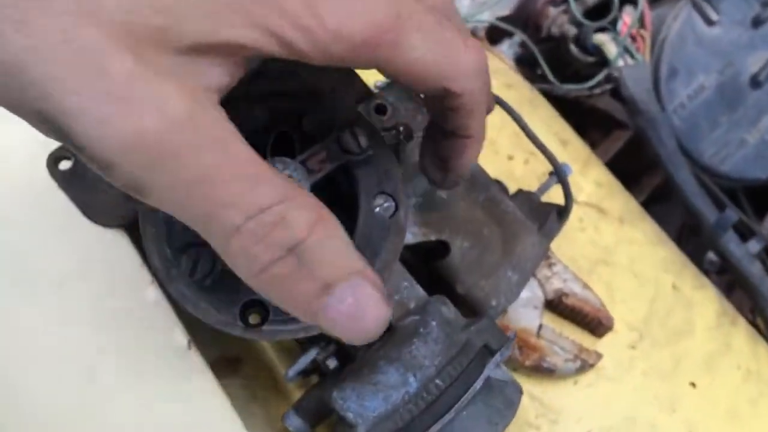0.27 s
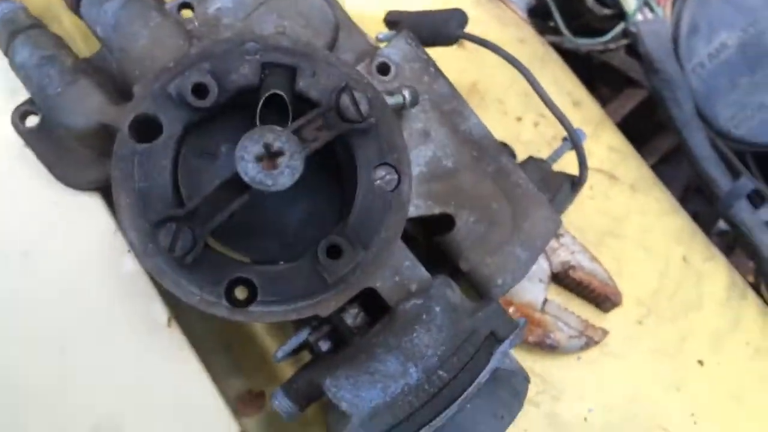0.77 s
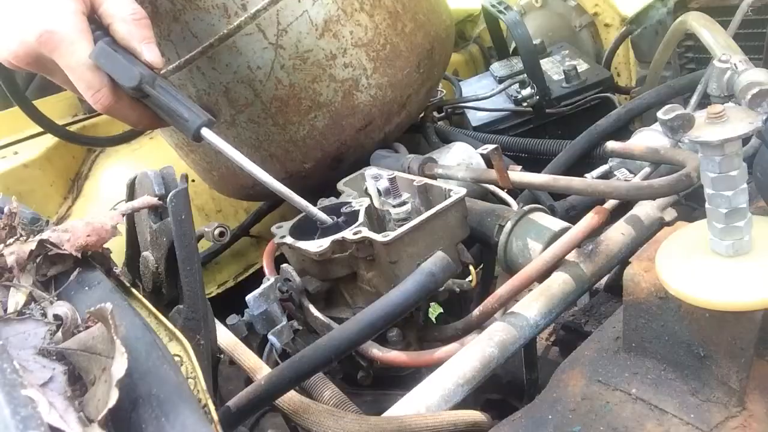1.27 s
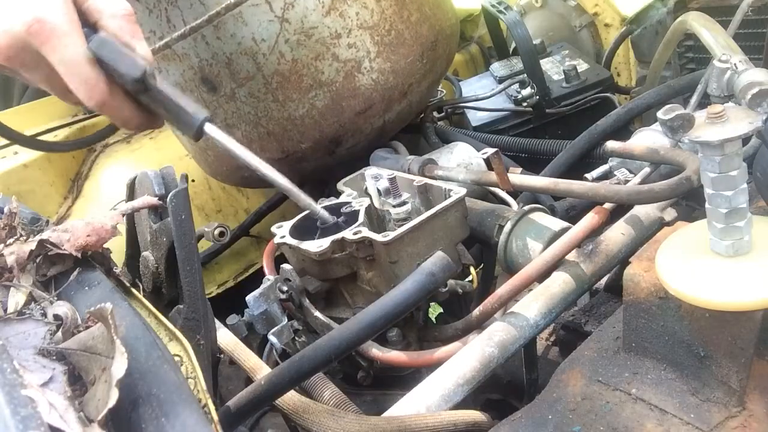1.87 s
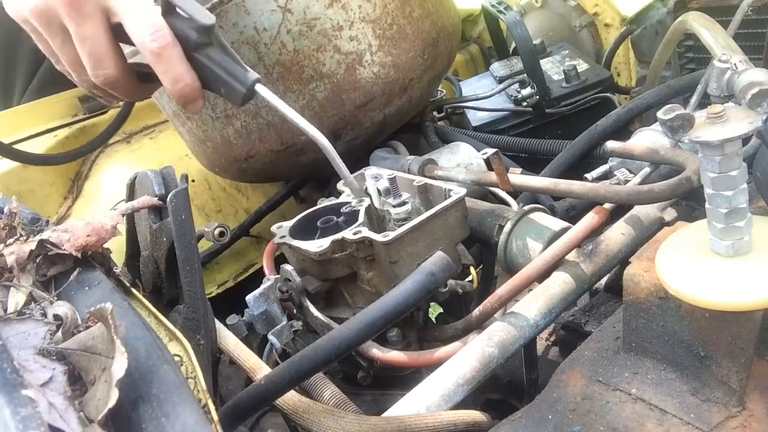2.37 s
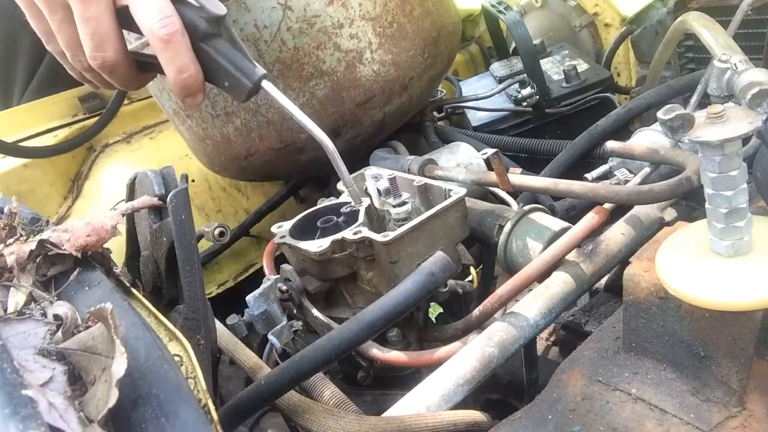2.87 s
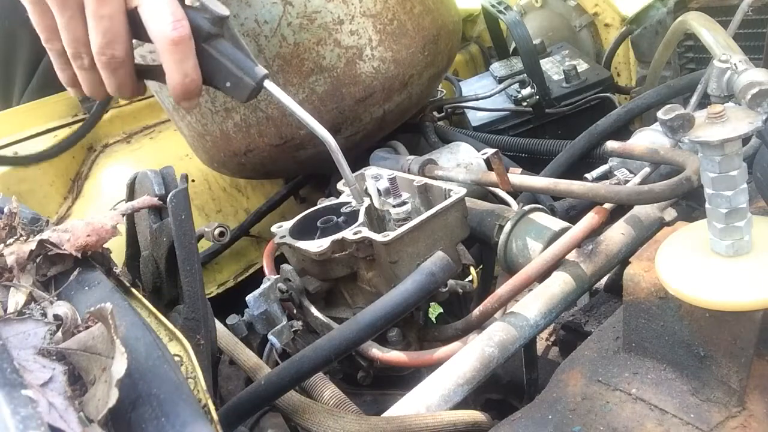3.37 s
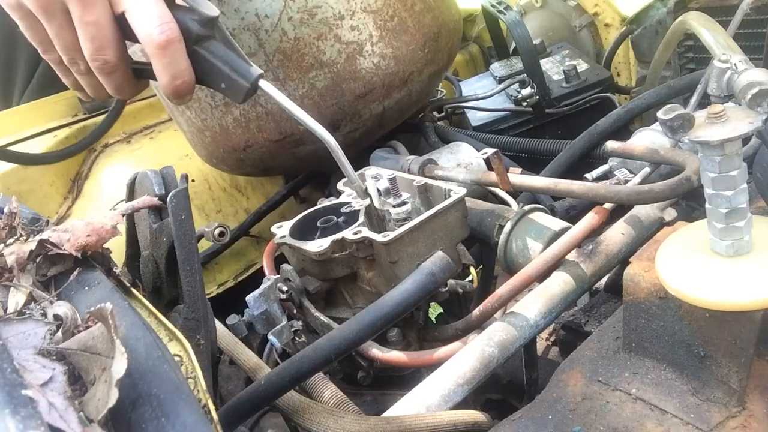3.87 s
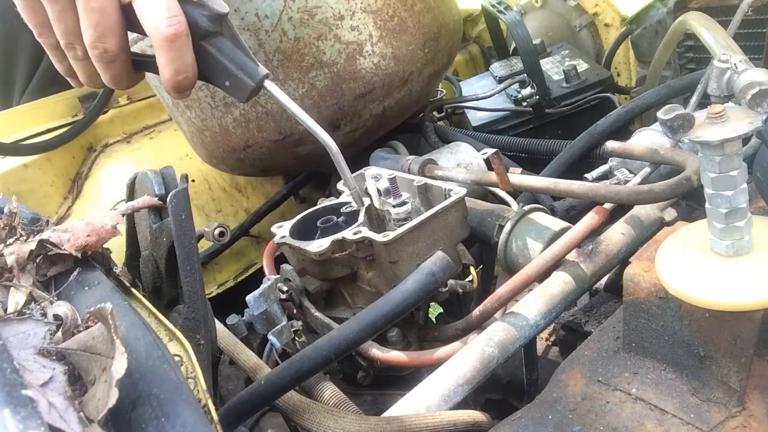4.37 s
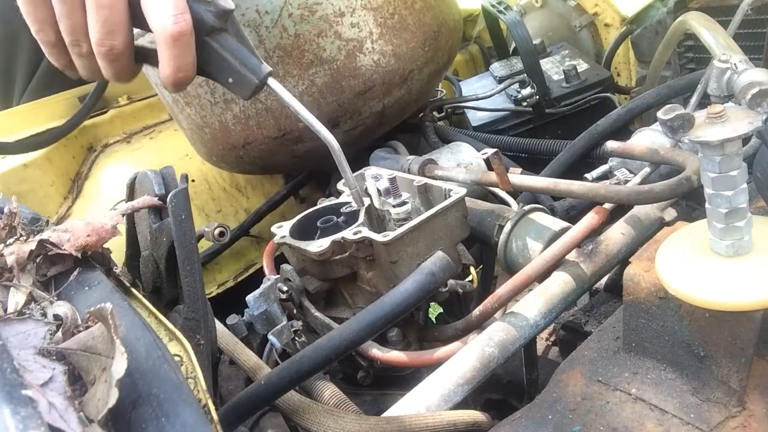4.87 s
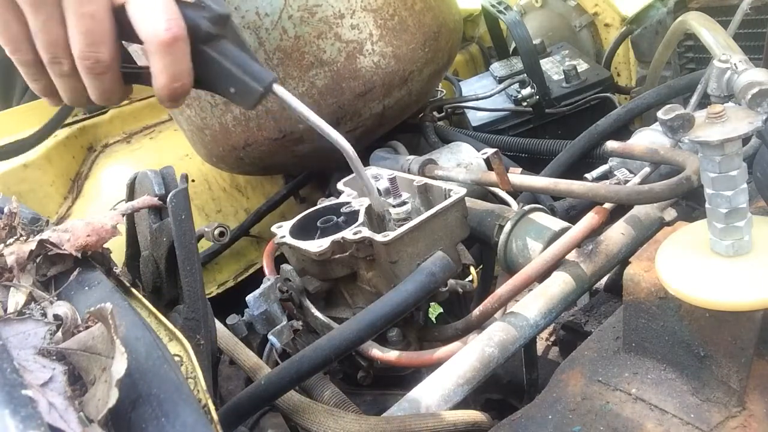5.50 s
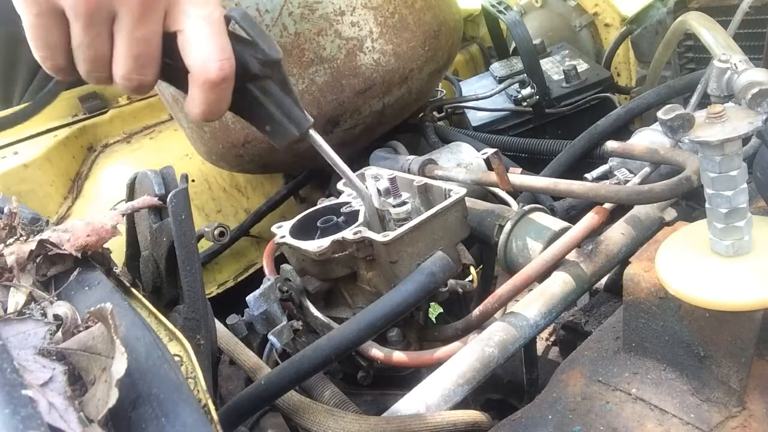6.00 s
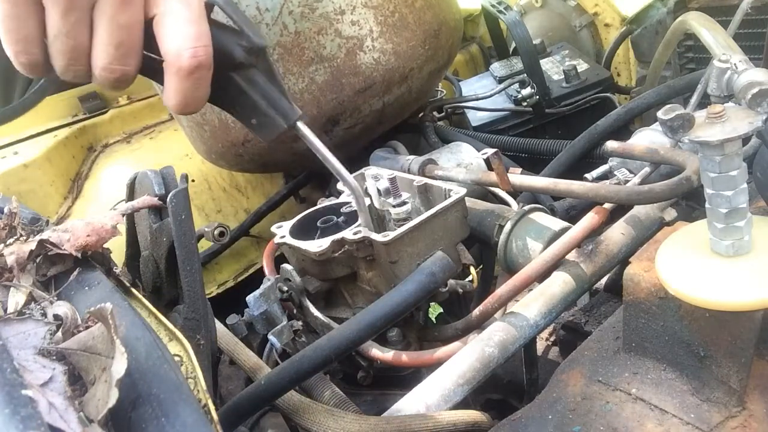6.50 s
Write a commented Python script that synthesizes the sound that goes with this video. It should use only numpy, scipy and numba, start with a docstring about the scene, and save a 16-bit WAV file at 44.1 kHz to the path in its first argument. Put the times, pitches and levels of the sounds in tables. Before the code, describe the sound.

A compressed-air gun fires ten short, harsh hissing blasts into a metal carburetor, with small metallic taps and clicks between them over a faint leaking hiss.

```python
"""First a still garage, with soft bumps of handling close to the microphone; then a rumble and a leaking hiss start.
A compressed-air blow gun fires ten short blasts into an open carburettor: shaped noise hisses, roars and takes
the colour of the hollow it is aimed at. Damped swings make the gusts, bumps and knocks, and noise bursts ring the
metal for taps and clicks. The recorder's limiter flattens the blasts and ducks the background after them."""
import sys
import numpy as np
from scipy import signal
from scipy.fft import rfft, irfft
from scipy.io import wavfile
from scipy.ndimage import uniform_filter1d, minimum_filter1d
from numba import njit

SR = 44100
rng = np.random.default_rng(int(sys.argv[2]) if len(sys.argv) > 2 else 0)


def generate_wav(sig):
    """Save sig (samples, or channels by samples) to the path in sys.argv[1] as 16-bit PCM at SR."""
    pcm = np.round(np.clip(np.atleast_2d(sig).T, -1, 1) * 32767).astype(np.int16)
    wavfile.write(sys.argv[1], SR, pcm)


N = 297234
TIME = np.arange(N) / SR
FREQ = np.maximum(np.arange(N // 2 + 1) * SR / N, 1)
WORK_STARTS_S = 1.149


def undb(db):
    """Decibels to gain."""
    return 10 ** (np.asarray(db) / 20)


def unit(x):
    """Scale to rms 1."""
    return x / np.sqrt(np.mean(x ** 2))


def curve(rows):
    """Join (time [s], value) rows by straight lines."""
    return np.interp(TIME, *np.transpose(rows))


def contour(points):
    """Level [dB] at every frequency, joined from (frequency [Hz], level [dB]) points."""
    hz, db = np.transpose(points)
    return np.interp(np.log(FREQ), np.log(hz), db)


def noise(shape_db):
    """Noise of rms 1 with the given spectrum."""
    return unit(irfft(rfft(rng.standard_normal(N)) * undb(shape_db), N))


def walk(rate):
    """Random wandering of spread about 1, heading for `rate` new values a second."""
    values = rng.standard_normal(N // 8)
    return 1.22 * np.interp(TIME * rate, np.arange(N // 8), values)


def band(x, hz, kind):
    """Gentle causal filter."""
    return signal.sosfilt(signal.butter(2, hz, kind, fs=SR, output="sos"), x)


def resonate(x, modes):
    """Ring a set of (frequency [Hz], width [Hz], level [dB]) resonances."""
    out = 0
    for hz, width, db in modes:
        out = out + undb(db) * signal.lfilter(*signal.iirpeak(hz, hz / width, SR), x)
    return out


def envelope(start, stop, rise, fall, drop_db=22):
    """Rise quickly, hold until `stop`, then lose drop_db in every `fall` seconds."""
    opening = np.clip((TIME - start) / rise, 0, 1) ** 2
    return opening * undb(-drop_db * np.clip((TIME - stop) / fall, 0, 10))


def place(sound, start):
    """Set a short sound at its time."""
    return np.pad(sound, (int(start * SR), N))[:N]


def push(start, db, hz, swell):
    """A soft push: a well damped swing whose envelope peaks after `swell` seconds and dies."""
    t = TIME[:SR // 4]
    shape = t / swell * np.exp(1 - t / swell)
    return place(undb(db) * shape * np.sin(2 * np.pi * hz * t), start)


def reflect(x, echo_db, count=8, longest_s=0.005, drift_s=0.00003):
    """Small engine parts nearby mirror the treble and comb the hiss; the paths shift as the hand moves."""
    out, treble = x, band(x, 1500, "high")
    for _ in range(count):
        delay = rng.uniform(0.000752, longest_s) + drift_s * walk(1.8)
        out = out + undb(echo_db) * np.interp(TIME - delay, TIME, treble)
    return out


# spectrum of the hiss at the shut valve: (frequency [Hz], relative density [dB per Hz])
LEAK_SPECTRUM = [(1060, -38), (1800, -9.5), (3620, -11.5), (3960, -15), (5000, -10), (6480, -8.5),
                 (7750, -6), (11500, -7.5), (12600, -6), (14600, -11), (15300, -3.5)]
# centre of the airy whistle in the leak: (time [s], frequency [Hz])
WHISTLE_PITCH = [(2.0, 7550), (2.166, 7940), (2.93, 7550), (3.05, 7590)]
LEAK_DB, LEAK_SAG_DB_PER_S = -47.5, 0.36
WHISTLE_DB = -64  # away from its swell
SWELL_S, SWELL_DB, SWELL_RISE_S, SWELL_FADE_S = 2.27, 11, 0.35, 0.75


def leak(waver_db=0.2, whistle_half_width_hz=600):
    """Air seeps past the shut valve: a thin, sinking hiss with an airy whistle that flares up once and fades."""
    phase = 2 * np.pi * np.cumsum(curve(WHISTLE_PITCH)) / SR
    swell = np.exp(np.minimum((TIME - SWELL_S) / SWELL_RISE_S, (SWELL_S - TIME) / SWELL_FADE_S))
    # slow noise times a tone is a band of noise around its pitch
    breath = band(rng.standard_normal(N), whistle_half_width_hz, "low")
    whistle = unit(breath * np.sin(phase)) * undb(WHISTLE_DB + SWELL_DB * swell)
    hiss_db = LEAK_DB - LEAK_SAG_DB_PER_S * (TIME - WORK_STARTS_S) + waver_db * walk(6.2)
    hiss = noise(contour(LEAK_SPECTRUM)) * undb(hiss_db)
    return reflect(hiss + whistle, echo_db=-14)


# spectrum of the still garage: (frequency [Hz], relative density [dB per Hz])
QUIET_SPECTRUM = [(15, -46.5), (25, -13), (59, -1.5), (186, -15.5), (264, -14), (354, -18), (558, -21),
                  (952, -16), (1030, -17.5), (2130, -28), (3630, -34.5), (4750, -35), (5880, -38),
                  (15000, -47)]
# spectrum of the rumble during the work: (frequency [Hz], relative density [dB per Hz])
RUMBLE_SPECTRUM = [(15, -37), (25, -16.5), (70, 2.5), (125, -1), (208, -5.5), (338, -17.5), (439, -10.5),
                   (651, -17), (1020, -11), (1430, -14.5), (1630, -25.5), (2200, -38), (2860, -53.5),
                   (4840, -120)]
QUIET_DB, RUMBLE_DB = -57.5, -46.5
RUMBLE_SAG_FROM_S, RUMBLE_SAG_DB_PER_S = 1.84, 2.53


def background(throb_db=1.0):
    """A still garage at first; then, abruptly, the leaking gun and a louder rumble that holds, then sinks."""
    sag_db = RUMBLE_SAG_DB_PER_S * np.maximum(TIME - RUMBLE_SAG_FROM_S, 0)
    rumble = noise(contour(RUMBLE_SPECTRUM)) * undb(RUMBLE_DB - sag_db + throb_db * walk(25))
    quiet = noise(contour(QUIET_SPECTRUM)) * undb(QUIET_DB)
    return np.where(TIME < WORK_STARTS_S, quiet, leak() + rumble)


# colour of the reverberation from the walls: (frequency [Hz], relative level [dB])
WALL_COLOUR = [(60, -15.5), (400, -9.5), (1100, -8.5), (2500, -1.5), (6000, 2.5), (15000, 1)]
# sheet metal of the engine bay that sings on: (frequency [Hz], width [Hz], level [dB])
PANELS = [(1197, 80, -34), (2770, 200, -34), (3834, 130, -37.5)]


def garage(x, wet_db=-25.5, t60=0.19, panel_t60=1.0):
    """A short, faint reverberation from the walls, and a longer ring of the sheet metal."""
    t = TIME[:SR]
    walls = noise(contour(WALL_COLOUR))[:SR] * undb(-60 * t / t60)
    panels = rng.standard_normal(SR) * undb(-60 * t / panel_t60)
    tail = undb(wet_db) * walls / np.linalg.norm(walls)
    tail = tail + resonate(panels / np.linalg.norm(panels), PANELS)
    return x + signal.fftconvolve(x, tail)[:N]


# soft bumps from handling: (time [s], envelope peak [dB], frequency [Hz])
BUMPS = [(0.265, -37.5, 122), (.865, -42, 81), (.948, -38, 101), (0.996, -46, 90), (1.03, -43, 105),
         (1.115, -32, 96), (1.239, -29.5, 109)]
# hollow knocks that ring a little longer: (time [s], envelope peak [dB], frequency [Hz])
KNOCKS = [(1.242, -36.5, 237), (3.955, -44, 441)]
# fingers rub the parts and the gun: (start [s], end [s], level [dB], low edge [Hz], high edge [Hz])
RUBS = [(0.763, 0.82, -72, 4100, 4930), (1.132, 1.324, -45, 80, 258), (5.13, 5.202, -54.5, 2470, 3280)]
BUMP_SWELL_S, KNOCK_SWELL_S = 0.0067, 0.019
RUB_RISE_S, RUB_FALL_S = 0.016, 0.048


def handling():
    """The hand bumps and knocks (damped swings) and rubs (bands of noise) the carburettor and the gun."""
    bumps = sum(push(start, db, hz, BUMP_SWELL_S) for start, db, hz in BUMPS)
    knocks = sum(push(start, db, hz, KNOCK_SWELL_S) for start, db, hz in KNOCKS)
    rubs = 0
    for start, stop, db, low_hz, high_hz in RUBS:
        friction = unit(band(rng.standard_normal(N), (low_hz, high_hz), "band"))
        rubs = rubs + undb(db) * friction * envelope(start, stop, RUB_RISE_S, RUB_FALL_S)
    return bumps + knocks + rubs


# modes of the nozzle and casting: (frequency [Hz], width [Hz], level [dB])
METAL = [(1180, 250, -3.5), (1700, 300, 0.5), (2500, 490, 5), (3930, 600, -9.5), (6700, 2000, -13.5)]


def contact(start, db, bright_db, t60, tick_db=-19, crack_db=6, crack_s=0.00075):
    """A sharp crack and a brief scuff that ring the nozzle and the casting."""
    t = TIME[:SR // 4]
    fading = undb(-60 * t / t60) + undb(crack_db) * np.exp(-t / crack_s)
    scuff = rng.standard_normal(len(t)) * fading
    ring = resonate(scuff, METAL) + undb(tick_db) * band(scuff, 900, "high")
    # tilt around 2 kHz, level below 1 kHz
    hz = np.arange(len(t) // 2 + 1) * SR / len(t)
    octaves = np.log2(np.maximum(hz, 1000) / 2000)
    ring = irfft(rfft(ring) * undb(bright_db * octaves), len(t))
    return place(undb(db) * ring / np.abs(ring).max(), start)


# the nozzle taps the casting: (time [s], peak [dB], brightness [dB per octave])
TAPS = [(1.646, -30, 3.5), (2.105, -33, -12), (2.406, -29, -6), (2.572, -20.5, -0.5), (3.724, -28, -2.5),
        (3.941, -33, -6), (3.953, -32, -4), (3.982, -32, -12), (5.588, -34, -2.5), (5.925, -37.5, -1.5)]
# small sharp clicks of the parts and the trigger: (time [s], peak [dB])
CLICKS = [(0.682, -42.5), (6.005, -10), (6.384, -14.5), (6.723, -20)]
TAP_T60_S, CLICK_T60_S, CLICK_DB_PER_OCTAVE = 0.087, 0.043, 6.5


def taps():
    """Ringing taps of the nozzle and shorter bright clicks."""
    nozzle = sum(contact(start, db, bright_db, TAP_T60_S) for start, db, bright_db in TAPS)
    clicks = sum(contact(start, db, CLICK_DB_PER_OCTAVE, CLICK_T60_S) for start, db in CLICKS)
    return nozzle + clicks


# colour of the jet at each aim: (frequency [Hz], relative density [dB per Hz])
JET_COLOUR = {"throat": [(18, -54), (30, -5), (452, -1.5), (1130, -0.5), (1320, 0), (1580, -3.5),
              (2110, -7.5), (2460, -8), (3460, -6.5), (5120, -6), (7770, -0.5), (8850, -9), (15300, -8.5)],
              "bowl": [(18, -52), (30, -23.5), (69, -8.5), (181, -9), (248, -3), (418, -3), (489, 0),
              (868, -2.5), (1160, -4.5), (2530, -9.5), (5250, -13), (6820, -11.5), (8400, -14.5),
              (13100, -14), (15300, -18.5)], "drilling": [(18, -40), (30, -10), (97, -4.5), (397, -6.5),
              (429, -3), (476, -1.5), (824, -3.5), (2000, -12), (2160, -12), (4860, -14), (5980, -10),
              (9820, -14), (15300, -10.5)]}
# air resonances of each hollow: (frequency [Hz], width [Hz], lift, or dip if negative [dB])
HOLLOWS = {"throat": [(560, 410, 4.5), (1298, 124, 6.5), (2130, 460, 9), (5160, 1000, 8.5),
           (6370, 960, 6.5), (7650, 250, 0), (7880, 250, 6.5), (11500, 2100, 4.5), (15500, 700, 6)],
           "bowl": [(600, 160, 0.5), (1030, 320, 0.5), (6500, 980, 1), (7800, 340, 3), (12100, 350, 4),
           (13100, 400, -5), (13950, 350, 5.5), (15100, 400, 3.5)], "drilling": [(520, 180, -2.5),
           (3750, 300, 5), (5960, 500, 5.5), (8630, 420, 8), (11840, 700, 8.5), (12920, 300, -1),
           (14600, 500, 9.5), (15000, 650, 3)]}


def jet(aim, flow, swirl, buffet_db, roar_db, top_db, buffet_hz=230, roar_hz=1100, top_hz=8500):
    """Fine turbulence hisses with the flow, large eddies roar with the swirl; the hollow colours both."""
    buffet = 1 / (1 + (FREQ / buffet_hz) ** 4)
    roar = 1 / (1 + (FREQ / roar_hz) ** 4)
    top = 1 / (1 + (top_hz / FREQ) ** 6)
    lift_db = sum(db / (1 + (2 * (FREQ - hz) / width) ** 2) ** 2 for hz, width, db in HOLLOWS[aim])
    balance_db = buffet_db * buffet + roar_db * roar + top_db * top
    colour = unit(undb(contour(JET_COLOUR[aim]) + lift_db + balance_db))
    rush = rng.standard_normal(N)
    eddies = rfft(rush * swirl) * roar
    hiss = rfft(rush * flow) * (1 - roar)
    return irfft((eddies + hiss) * colour, N)


# trigger pulls: (open [s], shut [s], level [dB], buffet [dB], roar [dB], top hiss [dB], aim)
BLASTS = [(1.331, 1.486, -9, -3, -0.5, -0.5, "throat"), (1.688, 1.84, -8, -3.5, -3.5, -0.5, "throat"),
          (3.169, 3.344, -.5, -3.5, 2, -2.5, "bowl"), (3.468, 3.676, 0, -1, 2.4, -5, "bowl"),
          (4.608, 4.792, -5.5, -1.5, -2, -2.5, "drilling"), (4.919, 5.087, -6, -0.5, 0.5, -3.5, "drilling"),
          (5.619, 5.801, -1, -5.5, 2, 1, "bowl"), (6.018, 6.205, -1.5, -1.5, -1.5, -0.3, "bowl"),
          (6.395, 6.571, -1, 3, 1.6, 1.2, "bowl"), (6.722, 6.902, -3, 12.5, -6, 12, "bowl")]
# how the air builds up and drains at each aim: (opening time [s], closing time [s], sputter [dB])
FLOW = {"throat": (.016, .015, 2.2), "bowl": (0.016, 0.01, 2.7), "drilling": (0.00916, 0.0166, 1.1)}
ONSET_DB, ONSET_S = -1, 0.0087  # the flow is slightly weaker just after opening


def blow_gun(eddy_rate=250, lag_s=0.003, puff_db=-25, puff_after_s=0.017, puff_s=0.0076):
    """Each pull lets out a jet; its large eddies form a moment later and sputter; a soft low puff follows."""
    out = np.zeros(N)
    for start, stop, db, buffet_db, roar_db, top_db, aim in BLASTS:
        rise, fall, sputter_db = FLOW[aim]
        onset = undb(ONSET_DB * np.exp(-np.abs(TIME - start) / ONSET_S))
        flow = envelope(start, stop, rise, fall) * onset
        # the last air leaves the casting
        puff = undb(puff_db) * np.exp(-((TIME - stop - puff_after_s) / puff_s) ** 2)
        sputter = unit(undb(sputter_db * walk(eddy_rate)))
        swirl = (envelope(start + lag_s, stop - lag_s, rise, fall) + puff) * sputter
        blast = jet(aim, flow, swirl, buffet_db, roar_db, top_db)
        out += undb(db) * blast * (TIME > start)
    return reflect(out, echo_db=-23.5)


# gusts at set moments thrown back at the microphone: (time [s], envelope peak [dB], frequency [Hz])
GUSTS = [(1.399, 0.5, 264), (4.673, 3.5, 410), (5.034, 5, 595)]
GUST_SWELL_S = 0.00049
# further gusts, scattered through the drilling blasts: per second, middle level [dB] and pitch [Hz]
GUST_RATE, GUST_DB, GUST_HZ = 18, 2.5, 420


def gusts(scatter_db=2, scatter_octaves=0.29):
    """Air thrown back by the casting strikes the microphone; the narrow drilling spits at random moments."""
    out = sum(push(start, db, hz, GUST_SWELL_S) for start, db, hz in GUSTS)
    for start, stop, *_, aim in BLASTS:
        if aim != "drilling":
            continue
        rise, fall, _ = FLOW[aim]
        count = round(GUST_RATE * (stop - start))
        for when, size, pitch in rng.uniform(-1.1, 1, (count, 3)):
            at = np.interp(when, (-1, 1), (start + rise, stop - fall))  # below -1: at full opening
            hz = GUST_HZ * 2 ** (scatter_octaves * pitch)
            out = out + push(at, GUST_DB + scatter_db * size, hz, GUST_SWELL_S)
    return out


def scene():
    """Blasts and taps in the garage, with gusts, handling and the background."""
    reverberant = garage(blow_gun() + taps())
    return (reverberant + gusts() + handling() + background())[None]


@njit
def recover(cut, release):
    """Follow a gain cut at once and let it go slowly."""
    out, held = np.empty(len(cut)), 0.
    for i in range(len(cut)):
        held = max(cut[i], held * (1 - release))
        out[i] = held
    return out


def limiter(x, threshold_db=-18, slope=0.58, window_s=0.018, hold_s=0.26, release_s=0.033):
    """Turn loud sound down, hold the gain there for a moment, then bring it back."""
    power = np.abs(uniform_filter1d(x ** 2, int(window_s * SR)))
    level_db = 10 * np.log10(power + 1e-12)
    gain_db = -slope * np.maximum(level_db - threshold_db, 0)
    half = int(hold_s * SR / 2)
    # the origin shifts the window so that it looks back only
    held_db = minimum_filter1d(gain_db, 2 * half + 1, origin=half, mode="nearest")
    return x * undb(-recover(-held_db, 1 / (release_s * SR)))


def record(dry, low_cut_hz=42, ceiling=0.75, top_hz=15450):
    """The microphone loses the deepest bass; the recorder limits the blasts, rounds peaks and cuts the top."""
    limited = limiter(band(dry[0], low_cut_hz, "high"))
    rounded = ceiling * np.tanh(limited / ceiling)
    top_cut = signal.ellip(10, 0.2, 70, top_hz, fs=SR, output="sos")
    return signal.sosfilt(top_cut, rounded)[None]


dry = scene()
out = record(dry)
generate_wav(out)
```